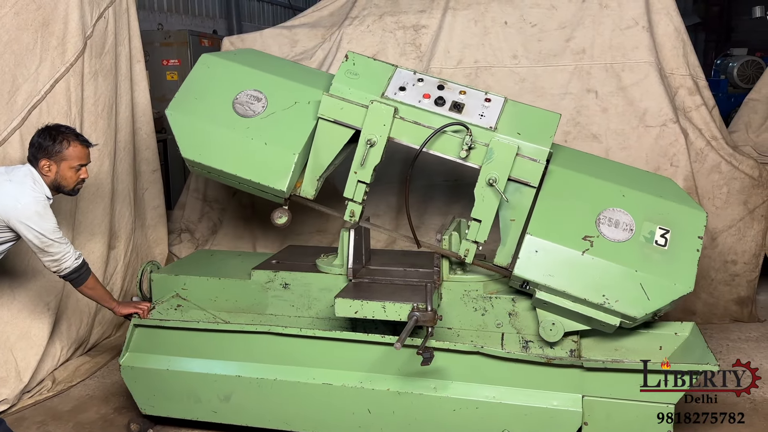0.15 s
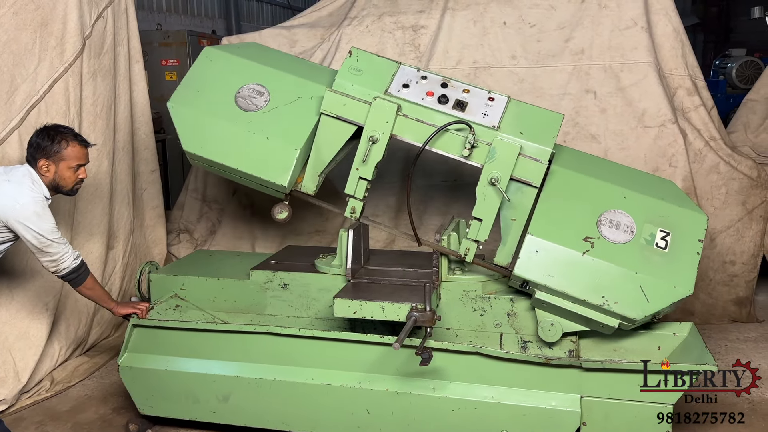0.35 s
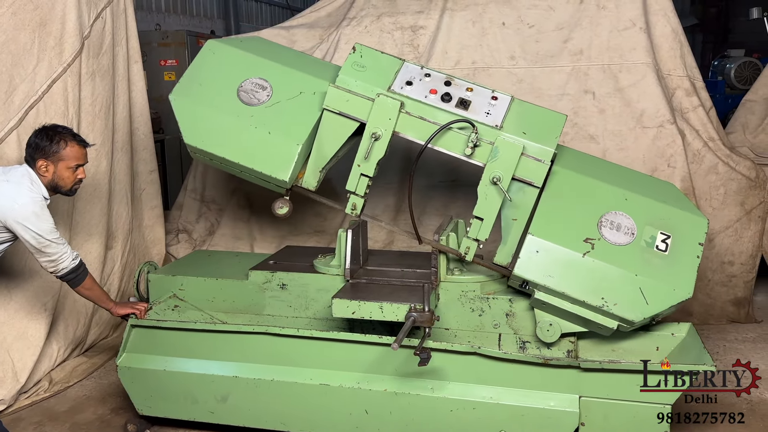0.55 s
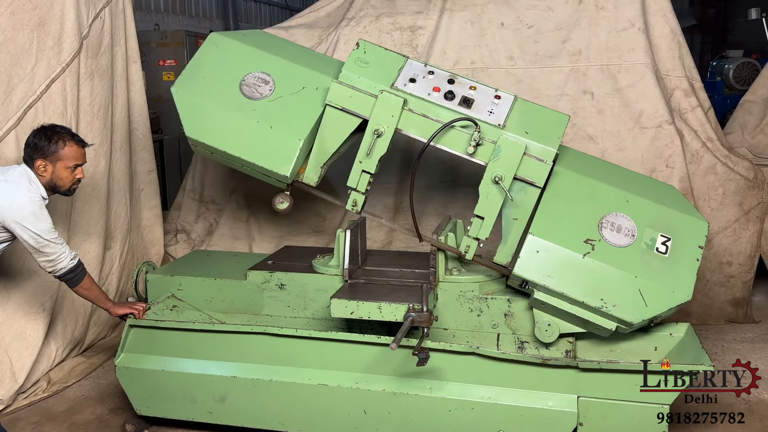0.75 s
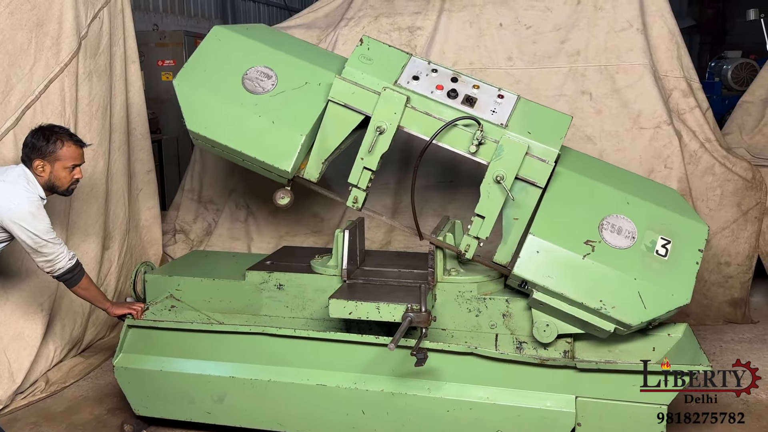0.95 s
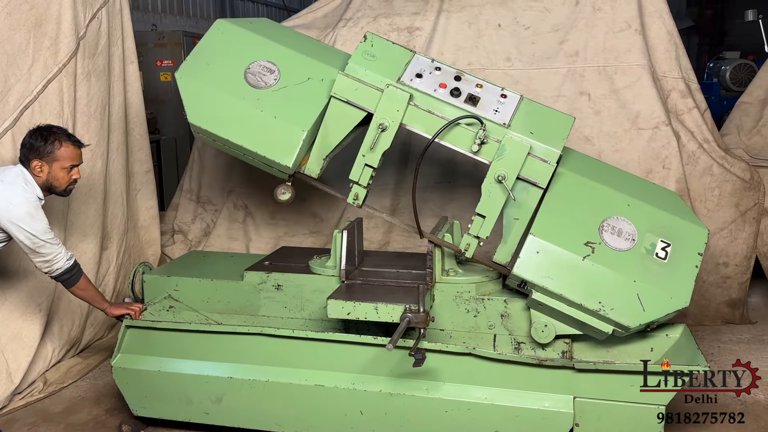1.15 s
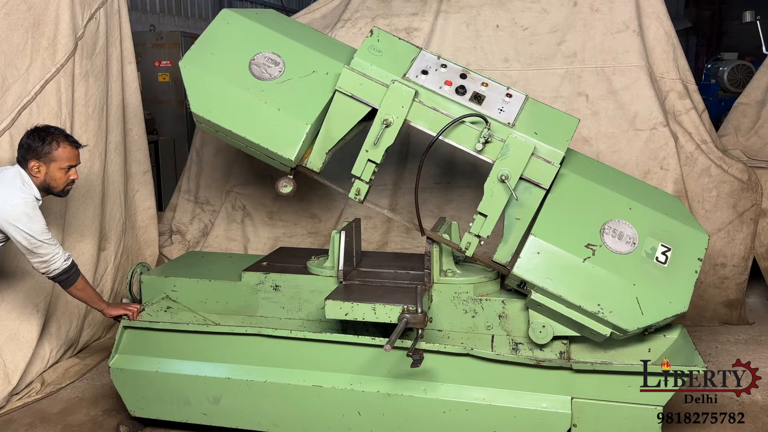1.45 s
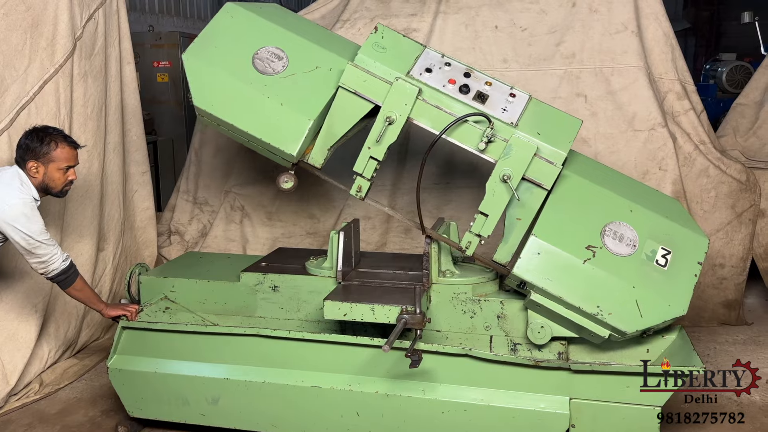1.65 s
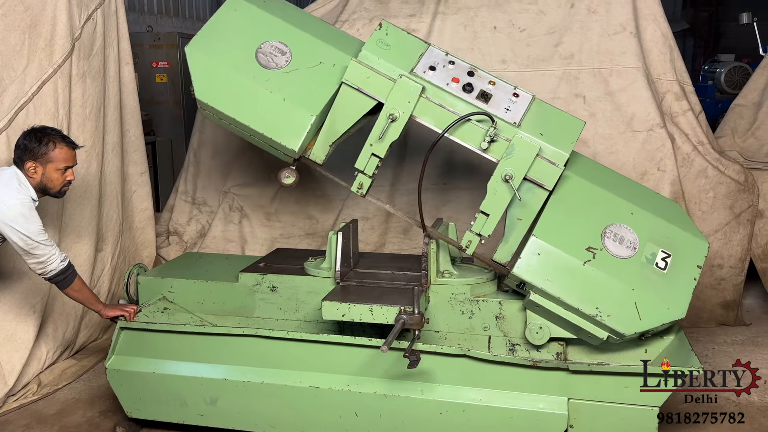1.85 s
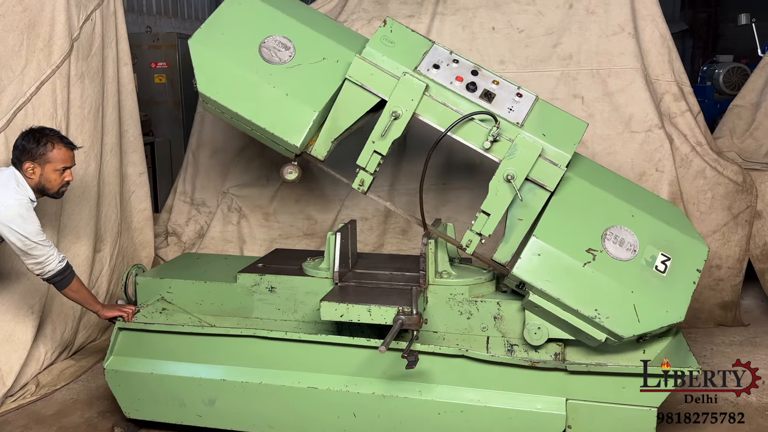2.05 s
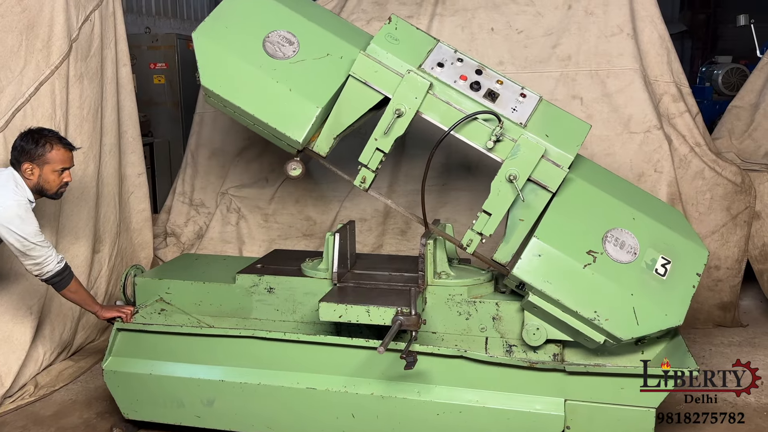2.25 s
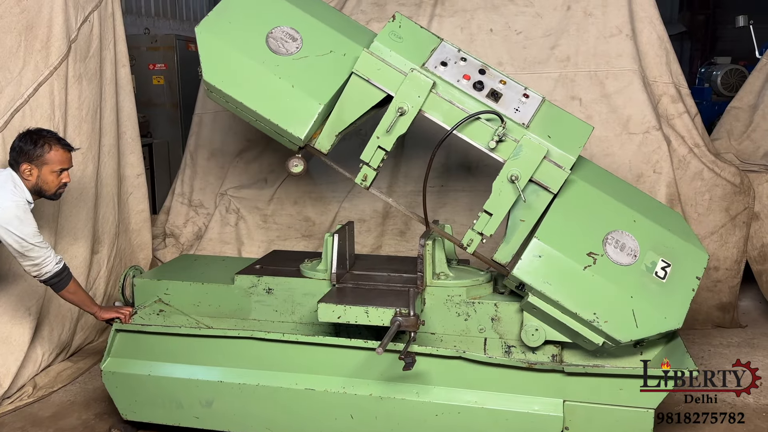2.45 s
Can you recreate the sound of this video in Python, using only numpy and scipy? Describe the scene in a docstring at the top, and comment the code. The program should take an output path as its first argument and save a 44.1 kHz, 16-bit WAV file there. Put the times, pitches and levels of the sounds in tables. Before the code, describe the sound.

A hydraulic pump motor hums low and steady over a soft rush of oil and fan, until a hard metallic switch clack echoes in the workshop; the hum dies quickly, leaving a hiss, low shudder and soft scuff.

```python
"""Hydraulic pump switching off

A pump motor hums in a workshop while it lifts the arm of a band saw; oil and fan rush along as coloured noise.
The switch drops out with one hard clack: a few blows of flattened noise, echoing in the workshop.
Sine modes ring its box and boom a panel, and random taps rattle the guards. The hum dies away, oil hisses
on through the valve as fading noise, the frame shudders in low sines and a soft, brief scuff follows."""
import sys
import numpy as np
from scipy import signal
from scipy.fft import rfft, irfft
from scipy.io import wavfile
from scipy.ndimage import uniform_filter1d

SR = 44100
rng = np.random.default_rng(int(sys.argv[2]) if len(sys.argv) > 2 else 0)


def put_to_file(sound):
    """Save the sound as 16-bit audio at rate SR, in the file named by the first command-line argument."""
    columns = np.atleast_2d(sound).T  # one column per channel
    safe = np.clip(columns, -1, 1)
    whole_steps = np.round(safe * 32767)
    wavfile.write(sys.argv[1], SR, whole_steps.astype(np.int16))


N = 114660  # 2.6 s
OFF_S = 2.285  # the motor loses power


def amp(db):
    """Decibels to gain."""
    return 10 ** (np.asarray(db) / 20)


def clock():
    """Time of every sample in seconds."""
    return np.arange(N) / SR


def since_off():
    """Seconds since the motor lost power, zero before."""
    return np.maximum(clock() - OFF_S, 0)


def decay(age, t60):
    """Exponential fade by 60 dB in t60 seconds."""
    return np.exp(-np.log(1000) * age / t60)


def unit(x):
    """Scales to rms 1."""
    return x / np.sqrt(np.mean(x ** 2) + 1e-20)


def curve(points):
    """Joins (s, value) points by straight lines."""
    return np.interp(clock(), *np.transpose(points))


def over_hz(points, hz):
    """Reads (Hz, value) points on a log frequency axis."""
    f, value = np.transpose(points)
    return np.interp(np.log(hz + 1), np.log(f + 1), value)


def colour(x, spectrum):
    """Filters by a curve of (Hz, dB) points."""
    hz = np.fft.rfftfreq(len(x), 1 / SR)
    return irfft(rfft(x) * amp(over_hz(spectrum, hz)), len(x))


def noise(spectrum):
    """Coloured noise of rms 1."""
    return unit(colour(rng.standard_normal(N), spectrum))


def band(hz, width):
    """Noise in one resonance, rms 1."""
    f = np.fft.rfftfreq(N, 1 / SR)
    resonance = 1 / (1 + ((f - hz) / width) ** 2) ** 2
    return unit(irfft(rfft(rng.standard_normal(N)) * resonance, N))


def drift(hz):
    """Slow random wander of rms 1, up to about hz."""
    f = np.fft.rfftfreq(N, 1 / SR)
    lowpass = (f > 0) * np.exp(-(f / hz) ** 2)
    return unit(irfft(rfft(rng.standard_normal(N)) * lowpass, N))


def dying(x, t60s):
    """Lets each band die at its own speed."""
    hz, t, z = signal.stft(x, SR, nperseg=128)
    z = z * decay(t, over_hz(t60s, hz)[:, None])
    return signal.istft(z, SR, nperseg=128)[1][:len(x)]


def evened(x, width_hz):
    """Levels out the peaks of a spectrum, leaving a dense, flat rattle."""
    z = rfft(x)
    bins = max(round(width_hz * len(x) / SR), 1)
    power = uniform_filter1d(abs(z) ** 2, bins)
    return irfft(z / np.sqrt(abs(power) + 1e-12), len(x))


def ring(age, hz, t60):
    """One mode: a sine that dies exponentially."""
    return np.sin(2 * np.pi * hz * age) * decay(age, t60)


def burst(s, rise, t60):
    """An envelope that swells exponentially up to time s and dies away."""
    age = clock() - s
    return np.exp(np.minimum(age / rise, -np.log(1000) * age / t60))


# Echo decay of the workshop. Each row: frequency in Hz, t60 in s before the spectrum is evened
ECHO_T60 = [(200, 0.53), (1500, 0.39), (4000, 0.34), (9000, 0.36), (14000, 0.24)]
ECHO_DB, ECHO_BUILD_S = -9.5, 0.0075


def workshop(x):
    """A diffuse echo: dying noise with an evened spectrum that builds up quickly."""
    half = SR // 2
    tail = evened(dying(rng.standard_normal(SR), ECHO_T60), width_hz=12)[:half]
    tail = tail * np.minimum(clock()[:half] / ECHO_BUILD_S, 1)
    return amp(ECHO_DB) * signal.fftconvolve(x, tail / np.linalg.norm(tail))[:N]


# Colour of the frame's rumble. Each row: frequency in Hz, relative level in dB per Hz
RUMBLE_COLOUR = [(20, -48), (31, -30), (48, -19), (70, -6.5), (120, -1.5), (150, -2.5), (190, -8.5),
                 (230, -5.5), (275, -12), (380, -10), (460, -28), (900, -71)]
# Swell of the rumble around its level. Each row: time in s, gain in dB
RUMBLE_SWELL = [(0, 3.5), (1.0, 0.5), (1.7, 1.5), (2.0, 2.5), (2.28, 5.5), (2.42, 7), (2.6, 5)]
# Low modes shuddering. Each row: centre in s, frequency in Hz, rms level at the centre in dB,
# length from the centre to 1/e in s
SHUDDERS = [(1.88, 127.4, -40, 0.051), (2.036, 129, -37.5, .05), (2.06, 205, -47, .03),
            (2.38, 112, -36, 0.018), (2.395, 212, -45, .025), (2.41, 133, -41, .04),
            (2.438, 232, -45.5, 0.022), (2.455, 200, -47, .015), (2.51, 78, -44.5, 0.085),
            (2.546, 168, -44, 0.04)]
RUMBLE_DB = -49.7


def frame():
    """The machine's frame rumbles as low noise, and shudders as the arm tops out and stops."""
    t = clock()
    out = noise(RUMBLE_COLOUR) * amp(RUMBLE_DB + curve(RUMBLE_SWELL))
    for s, hz, db, length in SHUDDERS:
        mode = unit(np.sin(2 * np.pi * (hz * t + rng.random())))
        out += amp(db) * np.exp(-((t - s) / length) ** 2) * mode
    return out


# Colour of oil passing the valve. Each row: frequency in Hz, relative level in dB per Hz
VALVE_COLOUR = [(200, -19.5), (480, 4.5), (900, -9.5), (2000, 1.8), (3200, -6.2), (5200, -12), (7000, -18),
                (9500, -28), (11500, -46), (16000, -46)]
VALVE_DB, VALVE_RISE_S, VALVE_HOLD_S, VALVE_FALL_DB_PER_S = -48.4, 0.115, 0.21, 48


def valve():
    """Oil hisses on through the valve after the stop: noise that rises, holds and ebbs."""
    age = since_off()
    ebb_db = VALVE_FALL_DB_PER_S * np.maximum(age - VALVE_HOLD_S, 0)
    return noise(VALVE_COLOUR) * np.minimum(age / VALVE_RISE_S, 1) * amp(VALVE_DB - ebb_db)


# Small ticks of the rising arm. Each row: peak time in s, level in dB, centre in Hz, width in Hz
TICKS = [(.54, -53, 1400, 900), (.865, -77, 8500, 3000), (.947, -75, 9000, 3000), (1.312, -73, 7500, 2500),
         (2.181, -60, 4100, 700), (2.184, -68, 5500, 1200)]
# One soft scuff. Its row: peak time in s, level in dB, rise in s, t60 in s
SCUFF = (2.498, -45, 0.0065, 0.087)
# Colour of the scuff. Each row: frequency in Hz, relative level in dB per Hz
SCUFF_COLOUR = [(500, -17), (2000, 1), (5000, -1.5), (7000, -10), (9500, -3), (12000, -16), (15500, -14)]
TICK_RISE_S, TICK_T60_S = .002, .05


def scrapes():
    """Faint ticks of narrow noise while the arm rises, and a bright noise scuff after it stops."""
    out = np.zeros(N)
    for s, db, hz, width in TICKS:
        out += amp(db) * band(hz, width) * burst(s, TICK_RISE_S, TICK_T60_S)
    s, db, rise, t60 = SCUFF
    return out + amp(db) * noise(SCUFF_COLOUR) * burst(s, rise, t60)


WAVER, WAVER_HZ = 0.33, 3  # depth of the wander as a fraction, and its speed


def wavering(turns):
    """A tone of rms 1 whose level and phase wander."""
    wander = 1 + WAVER * (drift(WAVER_HZ) + 1j * drift(WAVER_HZ))
    return unit((wander * np.exp(2j * np.pi * (turns + rng.random()))).real)


# Shaft speed before the coast-down factor; it sags as the arm nears the top.
# Each row: time in s, speed in turns per s
SHAFT_SPEED = [(0, 25.25), (1.0, 25.7), (1.5, 25.4), (1.88, 25.36), (2.05, 25.1), (2.29, 25.1)]
# Level of the hum under load, before the power fades. Each row: time in s, level in dB
HUM_LOAD = [(0, -30.8), (.35, -31.5), (.68, -30), (1.0, -32), (1.3, -29), (1.6, -30.5), (1.88, -29),
            (2.29, -30.5)]
# Weaker tones of the shaft. Each entry: cycles per turn
SHAFT_ORDERS = [1.5, 2, 2.5, 3, 3.5, 4.5, 5, 5.5, 6, 6.5, 7, 8, 9, 10, 10.5, 11]
# Levels of those tones. Each entry: dB against the hum
SHAFT_ORDER_DB = [-35.5, -36.5, -30, -18.5, -33, -21.5, -19.5, -28, -28.5, -25, -27.5, -27.5, -27, -31, -37,
                  -36]
# Steady tones of housing and bearings. Each row: frequency in Hz, level in dB
WHINE = [(109.5, -58), (157.7, -50), (221, -59), (249.6, -63), (581.7, -72), (777, -66.5), (956, -70),
         (1132, -73), (1729, -76), (2294, -79), (2793, -81)]
# Noisy resonances of the pump housing. Each row: centre in Hz, width in Hz, level in dB
HOUSING = [(772, 20, -68), (1180, 70, -70), (1720, 50, -72), (2850, 170, -72), (5240, 80, -85)]
# Colour of oil and fan. Each row: frequency in Hz, relative level in dB per Hz
RUSH_COLOUR = [(150, -21), (400, 2), (600, 1.5), (950, 1), (1300, -2.5), (1750, -5), (2150, -9.5),
               (2850, -9), (3500, -15.5), (4400, -23.5), (5600, -21.5), (6800, -28), (9500, -29),
               (10400, -37), (11300, -48), (16000, -59)]
# Swell of the rush around its level. Each row: time in s, gain in dB
RUSH_SWELL = [(0, -0.48), (.5, -0.89), (.9, 0.29), (1.3, -0.64), (1.8, 0.82), (2.25, 0.7), (2.6, 0)]
HUM_ORDER, HUM_WAVER = 4, 0.035  # cycles per turn, rms level wander as a fraction
HUM_HOLD_S, HUM_FALL_DB_PER_S = 0.045, 85
COAST_S = 3.55  # the speed falls to 1/e in this time
RUSH_DB, RUSH_THROB, RUSH_THROB_ORDER, RUSH_FLICKER_DB = -51.9, 0.063, 1.5, 0.63


def motor():
    """A hum at four times the shaft speed, weaker orders and whine die at the stop; a throbbing rush stays."""
    t, age = clock(), since_off()
    turns = np.cumsum(curve(SHAFT_SPEED) * np.exp(-age / COAST_S)) / SR
    power = amp(-HUM_FALL_DB_PER_S * np.maximum(age - HUM_HOLD_S, 0))

    hum = np.sqrt(2) * np.sin(2 * np.pi * HUM_ORDER * turns)
    hum = hum * (1 + HUM_WAVER * drift(WAVER_HZ))
    orders = sum(amp(db) * wavering(k * turns) for k, db in zip(SHAFT_ORDERS, SHAFT_ORDER_DB))
    whine = sum(amp(db) * wavering(hz * t) for hz, db in WHINE)
    housing = sum(amp(db) * band(hz, width) for hz, width, db in HOUSING)

    throb = 1 + RUSH_THROB * np.sin(2 * np.pi * RUSH_THROB_ORDER * turns)
    rush_db = RUSH_DB + curve(RUSH_SWELL) + RUSH_FLICKER_DB * drift(hz=25)
    rush = noise(RUSH_COLOUR) * throb * amp(rush_db)
    return power * (amp(curve(HUM_LOAD)) * (hum + orders) + whine + housing) + rush


# Modes of the switch box. Each row: frequency in Hz, level in dB before rise and decay, t60 in s
BOX_MODES = [(1040, -21, 0.04), (1180, -22, 0.04), (1470, -13.5, 0.046), (1920, -24, 0.05),
             (2230, -25, .035), (2550, -31, 0.035), (3080, -23.5, 0.03), (3450, -27.5, .04),
             (3790, -23.5, 0.05), (4450, -27, .025), (4770, -28, 0.035), (5300, -24.5, 0.02),
             (5690, -20, 0.02)]
# Low modes of the sheet panel. Each row: starting frequency in Hz, level in dB before rise and decay, t60 in s
PANEL_MODES = [(262, -26, .2), (322, -13.5, .1), (400, -26, .07)]
# Colour of the chattering guards. Each row: frequency in Hz, relative level in dB per Hz
CHATTER_COLOUR = [(200, -25), (550, -3), (850, -8), (1100, -1), (1400, -4), (1900, 2), (2400, -4),
                  (3500, -6), (5000, -15), (7200, -16), (10000, -23), (12000, -40)]
BOX_RISE_CYCLES = 8
PANEL_RISE_S, PANEL_SAG_HZ_PER_S = .031, 750
CHATTER_DB, CHATTER_PER_S, CHATTER_RISE_S, CHATTER_T60_S = -33.5, 500, .04, .34  # level before the fade
CHATTER_CLUMP_DB, CHATTER_CLUMP_HZ = 2.2, 55


def cabinet():
    """The clack rings the damped switch box, high modes first, booms a panel and sets loose guards chattering."""
    age = since_off()
    box = np.zeros(N)
    for hz, db, t60 in BOX_MODES:
        rise = np.minimum(age * hz / BOX_RISE_CYCLES, 1) ** 2
        box += amp(db) * ring(age, hz, t60) * rise

    panel = np.zeros(N)
    for hz, db, t60 in PANEL_MODES:
        # half the sag here: the pitch is the slope of the phase
        panel += amp(db) * ring(age, hz - PANEL_SAG_HZ_PER_S * age / 2, t60)
    panel *= np.minimum(age / PANEL_RISE_S, 1) ** 2  # the boom swells in gently at the start

    taps = rng.choice([-1., 1.], N) * (rng.random(N) < CHATTER_PER_S / SR)
    fade = np.minimum(age / CHATTER_RISE_S, 1) * decay(age, CHATTER_T60_S)
    clumps = amp(CHATTER_DB + CHATTER_CLUMP_DB * drift(CHATTER_CLUMP_HZ))
    return box + panel + unit(colour(taps, CHATTER_COLOUR)) * fade * clumps


# Blows of the switch as it opens and bounces, before the spectrum is evened.
# Each row: time in s, relative level in dB, treble edge in Hz
BLOWS = [(2.2849, -3, 14000), (2.2857, 4.5, 12000), (2.2869, 0, 6000), (2.2900, 2.5, 1800),
         (2.3000, -5, 3500)]
# Colour of the clack. Each row: frequency in Hz, relative level in dB per Hz
CLACK_COLOUR = [(150, -17), (400, -8), (750, -5.5), (1100, 0), (1300, -.5), (1500, .5), (1750, 2.5),
                (2050, 3.5), (2400, -4), (3100, -4), (3550, -2), (3900, -4.5), (4400, -8.5), (5200, -7.5),
                (5900, -9), (6500, -14.5), (7200, -13), (9200, -12), (10400, -17.5), (11300, -31),
                (15500, -28)]
# Ring time of each blow before evening. Each row: frequency in Hz, t60 in s
CLACK_T60 = [(300, 0.1), (1500, 0.11), (3500, 0.078), (6000, 0.03), (12000, 0.06)]
CLACK_DB, CLACK_RISE_S, CLACK_SMOOTH_HZ = 3.8, 0.00012, 45  # level of the whole clack's energy


def switch():
    """A few quick blows of dying noise, evened and coloured, make a dense metallic crack."""
    t = clock()[:SR // 2]
    rattle = np.zeros(len(t))
    first = BLOWS[0][0]
    for s, db, edge_hz in BLOWS:
        blow = dying(rng.choice([-1., 1.], len(t)), CLACK_T60)
        blow = blow * (1 - np.exp(-t / CLACK_RISE_S))
        blow = signal.lfilter(*signal.butter(2, edge_hz, fs=SR), blow)
        start = round((s - first) * SR)
        rattle[start:] += amp(db) * blow[:len(t) - start]
    rattle = colour(evened(rattle, CLACK_SMOOTH_HZ), CLACK_COLOUR)[:len(t) // 2]

    out = np.zeros(N)
    start = round(first * SR)
    clack = amp(CLACK_DB) * rattle / np.linalg.norm(rattle)
    out[start:start + len(clack)] = clack[:N - start]
    return out


def scene():
    """Frame, valve, pump and cabinet, with the sharp sounds echoing in the workshop."""
    hits = scrapes() + switch()
    machine = frame() + valve() + motor() + cabinet()
    return (machine + hits + workshop(hits))[None]


CUTOFF_HZ = 15900


def record(dry):
    """A steep linear-phase low-pass limits the treble."""
    lowpass = signal.firwin(511, CUTOFF_HZ, window=("kaiser", 9), fs=SR)
    return signal.oaconvolve(dry, lowpass[None], "same")


dry = scene()
out = record(dry)
put_to_file(out)
```